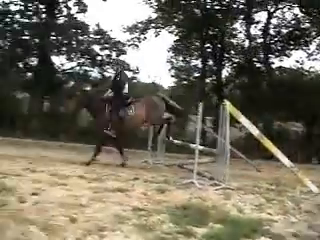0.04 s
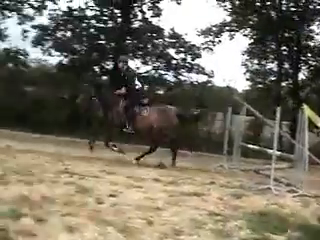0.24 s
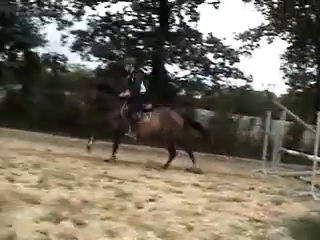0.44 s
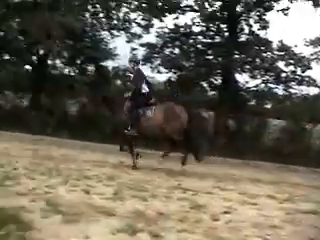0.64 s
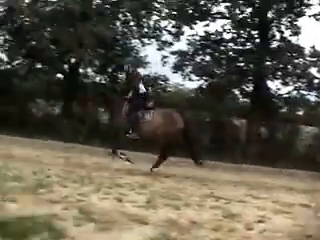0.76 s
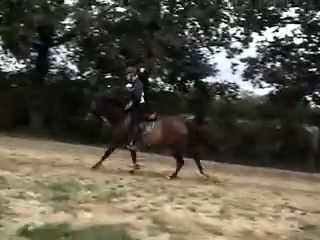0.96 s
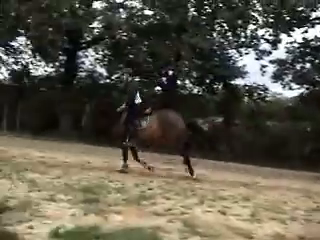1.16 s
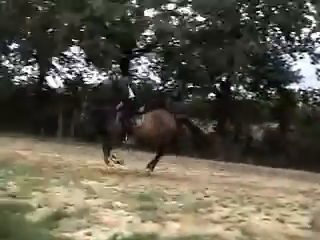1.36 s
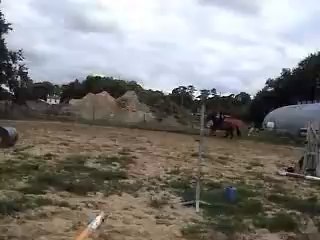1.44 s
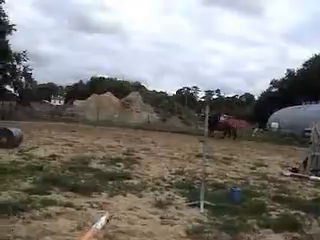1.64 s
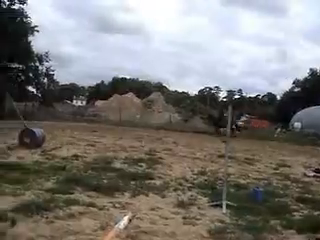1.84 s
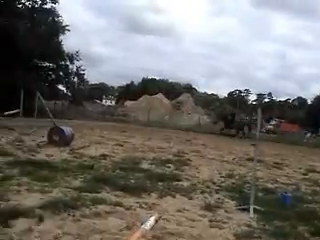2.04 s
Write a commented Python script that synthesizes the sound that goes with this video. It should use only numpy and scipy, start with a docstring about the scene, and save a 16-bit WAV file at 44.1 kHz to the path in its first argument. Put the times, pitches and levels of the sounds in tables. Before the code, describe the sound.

Hooves thud unevenly on sand as a horse lands, with a sharp rattling pole knock, and canters by outdoors. Wind rumbles on the microphone and leaves rustle; after a tiny break, a louder rush of wind takes over.

```python
"""Horse landing in a sandy arena

Outdoors, a horse lands from a jump and canters past the microphone. Just after the landing a loud
knock rings on, probably a jump pole, with a spray of sand; dull hoof thuds follow while wind buffets
the microphone. After a brief gap, a second scene begins with a louder, hissing rush."""
import sys
import numpy as np
from scipy import signal
from scipy.fft import rfft, irfft
from scipy.io import wavfile

SR = 44100
rng = np.random.default_rng(int(sys.argv[2]) if len(sys.argv) > 2 else 0)


def dump_mix(stems):
    """Bounce the given channels to the path in sys.argv[1] as a 16-bit WAV at rate SR."""
    frames = np.atleast_2d(stems).T  # one column per channel
    limited = np.clip(frames, -1, 1)  # hard clip at full scale
    pcm = np.round(limited * 32767).astype(np.int16)
    wavfile.write(sys.argv[1], SR, pcm)


N = 92610
T = np.arange(N) / SR
GAP_START_S, GAP_END_S = 1.542, 1.557


def from_db(db):
    """Decibels to gain."""
    return 10 ** (np.asarray(db) / 20)


def level(rows):
    """Gain over time from (time [s], level [dB]) points."""
    return from_db(np.interp(T, *np.transpose(rows)))


def colour(x, points):
    """Filter by a curve of (frequency [Hz], gain [dB]) points."""
    hz, db = np.transpose(points)
    bins_hz = np.maximum(np.arange(N + 1) * SR / (2 * N), 1)
    gain = from_db(np.interp(np.log(bins_hz), np.log(hz), db))
    return irfft(rfft(x, 2 * N) * gain)[:N]


def noise(spectrum, grain_db=0):
    """Coloured noise of rms 1; uneven grain sizes make it gritty."""
    sizes = from_db(grain_db * np.minimum(rng.exponential(1, N // 16 + 1), 5))
    x = colour(rng.standard_normal(N) * np.repeat(sizes, 16)[:N], spectrum)
    return x / x.std()


def strike(start, rise, decay):
    """Straight attack and exponential decay, times in seconds."""
    age = T - start
    return np.clip(age / rise, 0, 1) * np.exp(-np.maximum(age - rise, 0) / decay)


def swell(start, length):
    """A rounded rise and fall."""
    return np.sin(np.pi * np.clip((T - start) / length, 0, 1))


# Ringing modes of the pole: (frequency [Hz], level [dB], time to fall 60 dB [s])
POLE_MODES = [(197.8, -23.5, 0.3), (331, -32.5, 0.34), (522, -28.5, 0.24), (613, -24, 0.23),
              (684, -38, 0.55), (788, -27.5, 0.16), (932, -40.5, 0.4), (1184, -32, 0.38), (1318, -31, 0.5),
              (1390, -48, .3), (1444, -30.5, 0.41), (2187, -33.5, 0.48), (2410, -46, 0.23), (2432, -41, 1),
              (2806, -33, 0.57), (3130, -28.5, 0.31), (3171, -34, 0.32), (4023, -45.5, 0.92),
              (4280, -38, 0.49)]
# Spectra of the rattle and of crunching sand (smack and hooves): (frequency [Hz], gain [dB])
RATTLE_SPECTRUM = [(60, -26), (150, -5), (400, -3.5), (720, 7.5), (1000, 0), (1500, 4), (2200, 0),
                   (3100, -1.5), (3900, -8), (4350, -2.5), (8000, -10), (13000, -15)]
CRUNCH_SPECTRUM = [(50, -8), (130, 0), (300, 3), (700, 1.5), (1300, -8.5), (2500, -20), (4300, -31),
                   (8000, -30), (13000, -24)]
def pole_knock(start=.2065, thump_hz=222.5):
    """A heavy thump and smack, then a dense rattle and the ringing modes of the struck pole."""
    age = T - start
    pulse = np.exp(-.5 * ((age - .012) / .0068) ** 2) * np.clip(age / .0019, 0, 1)
    thump = from_db(-11.5) * pulse * -np.sin(2 * np.pi * thump_hz * age)
    smack = from_db(-17.5) * strike(start + .0063, rise=.004, decay=.0047) * noise(CRUNCH_SPECTRUM)
    settling = np.exp(-np.maximum(age - .12, 0) / .077)  # the rattle's tail dies faster
    rattle = from_db(-22) * strike(start + .0021, rise=.0087, decay=.12) * settling
    rattle *= noise(RATTLE_SPECTRUM, grain_db=2.1)
    ring = np.zeros(N)
    for hz, db, t60 in POLE_MODES:
        envelope = from_db(db) * strike(start + .0097, rise=.006, decay=t60 / np.log(1000))
        ring += envelope * np.sin(2 * np.pi * (hz * age + rng.random()))
    return thump + smack + rattle + ring


# Hoof falls going past the microphone:
# (time [s], thud level [dB], mid pitch [Hz], thud rise [s], crunch level [dB])
HOOF_FALLS = [(0.144, -29, 124, .005, -37), (0.425, -27, 96, 0.0037, -37.5),
              (.440, -24.5, 200, 0.0023, -45), (0.507, -31.5, 250, 0.0027, -45),
              (0.567, -20, 161.1, 0.0043, -27), (0.593, -30, 132, 0.0032, -37),
              (0.636, -43, 130, .003, -36), (0.659, -29.5, 121, 0.0065, -47), (.711, -22, 197, 0.0049, -27),
              (0.744, -27.5, 123, 0.0098, -33.5), (.924, -27, 157, 0.0082, -48),
              (.992, -22.5, 128, 0.0083, -54), (1.068, -25, 151.6, 0.01, -57),
              (1.115, -22.5, 178, 0.0035, -34), (1.155, -27.5, 139, 0.0057, -61),
              (1.237, -21.5, 150, 0.0087, -31), (1.268, -22.5, 160, 0.0046, -42),
              (1.326, -28.5, 174, 0.005, -41), (1.382, -30, 190, 0.0045, -35.5),
              (1.397, -27.5, 284, 0.0026, -43), (1.444, -32.5, 220, 0.0048, -47),
              (1.512, -28, 155, 0.0082, -49), (1.797, -23, 187, 0.003, -36), (1.828, -21, 127, 0.0067, -42),
              (2.039, -27.5, 167, 0.0054, -32.5)]
# What the arena floor passes on of a thud: (frequency [Hz], gain [dB])
GROUND_RESPONSE = [(30, -9), (60, 3), (110, -0.5), (400, 0.5), (1500, -10)]
def hooves(pitch_sag=.14):
    """Each hoof pushes the ground for a few cycles of sagging pitch and crunches the sand."""
    thuds, crunches = np.zeros(N), np.zeros(N)
    for start, thud_db, mid_hz, rise, crunch_db in HOOF_FALLS:
        age = np.maximum(T - start, 0) / rise  # in rise times
        push = (age * np.exp(1 - age)) ** 1.8
        hz = mid_hz * (age > 0) * (1 + pitch_sag * (np.exp(-age / 2) - .5))
        thuds += from_db(thud_db) * push * -np.sin(2 * np.pi * np.cumsum(hz) / SR)
        crunches += from_db(crunch_db) * strike(start, rise=.0014, decay=.0097)
    return colour(thuds, GROUND_RESPONSE) + crunches * noise(CRUNCH_SPECTRUM, grain_db=3)


# The harder hoof falls: (time [s], level [dB])
HARD_FALLS = [(0.567, -33), (.712, -29.5), (1.119, -33.5), (1.241, -31), (1.383, -34), (1.397, -33.5)]
# Their hollow spectrum: (frequency [Hz], gain [dB])
CLOP_SPECTRUM = [(120, -18), (280, 1.5), (450, -2.5), (700, -3), (1000, -15), (2500, -33)]
def clops():
    """Packed sand under the hoof gives a short hollow knock."""
    envelope = sum(from_db(db) * strike(start, rise=.0014, decay=.0057) for start, db in HARD_FALLS)
    return envelope * noise(CLOP_SPECTRUM)


# Sand kicked up from the arena floor: (time [s], length [s], level [dB])
SAND_SPRAYS = [(0.179, 0.051, -34.5), (0.356, 0.097, -41.5), (.768, 0.096, -37)]
# Ticks of grit or tack: (time [s], level [dB])
GRIT_TICKS = [(.2165, -18), (0.2321, -15.5), (0.568, -34), (0.635, -42), (0.794, -35.5), (1.115, -28.5)]
# Spectra of both at the microphone: (frequency [Hz], gain [dB])
SPRAY_SPECTRUM = [(200, -22), (700, 9), (1500, -1.5), (2500, -3.5), (3500, -6), (4200, -14), (8000, -13),
                  (13000, -17)]
TICK_SPECTRUM = [(400, -8), (1500, 2), (2600, 2.5), (3500, 9), (4100, -12), (8000, -7), (13000, -5.5)]
def grit():
    """Flying sand hisses in sprays that start fast and hold; grit or tack ticks sharply."""
    sprays = sum(from_db(db) * np.abs(swell(start, length)) ** .46 for start, length, db in SAND_SPRAYS)
    ticks = sum(from_db(db) * strike(start, rise=.00056, decay=.0015) for start, db in GRIT_TICKS)
    return sprays * noise(SPRAY_SPECTRUM, grain_db=1.6) + ticks * noise(TICK_SPECTRUM)


# Buffeting and deep rumble right on the microphone: (time [s], level [dB])
BUFFET_LEVELS = [(0, -61), (.38, -49.5), (.55, -44.5), (.68, -41), (.78, -37), (.87, -39), (.96, -34.5),
                 (1.04, -39.5), (1.1, -34.5), (1.19, -44.5), (1.29, -33), (1.38, -43), (1.47, -44),
                 (1.62, -53), (1.75, -49), (1.85, -38), (1.95, -69), (2.07, -41.5)]
RUMBLE_LEVELS = [(0, -58), (.1, -54), (.2, -40), (.3, -68), (.42, -48.5), (.55, -47), (.66, -43), (.8, -52),
                 (.9, -43), (1.04, -43), (1.17, -59), (1.4, -64), (1.6, -58), (1.72, -51), (1.86, -44),
                 (1.96, -61), (2.06, -42.5)]
# Their spectra: (frequency [Hz], gain [dB])
BUFFET_BAND = [(25, -31), (50, -35), (90, -3), (140, 0.5), (200, -2.5), (300, -16.5), (600, -22),
               (1500, -68)]
RUMBLE_BAND = [(20, -12), (35, -5), (65, 1), (95, -0.5), (140, -21), (300, -45), (1000, -67)]
def microphone_wind():
    """Gusts push on the microphone, making low, uneven noise."""
    return level(BUFFET_LEVELS) * noise(BUFFET_BAND) + level(RUMBLE_LEVELS) * noise(RUMBLE_BAND)


# Trees by the arena before the gap, and the hissing rush after it: (time [s], level [dB])
RUSTLE_LEVELS = [(0, -42), (.12, -45.5), (.45, -41), (.68, -43.5), (.92, -44), (1.05, -43.5), (1.18, -43.5),
                 (1.35, -42), (1.45, -46.5), (1.54, -44)]
RUSH_LEVELS = [(1.56, -32.5), (1.63, -36), (1.72, -34), (1.9, -34.5), (2.1, -36)]
# Spectra of the nearby leaves and of the rush: (frequency [Hz], gain [dB])
RUSTLE_BAND = [(40, -15), (200, -0.5), (400, -5), (720, 2), (1200, -4.5), (2500, -10), (4300, -16),
               (8000, -20), (13000, -22.5)]
RUSH_BAND = [(40, -20), (200, 0), (400, 0.5), (780, 1.5), (1300, -3), (2500, -8), (4300, -12.5),
             (8000, -18.5), (13000, -21.5)]
def rustle_and_rush():
    """Wind stirs the leaves into a grainy rustle; in the second scene a louder rush replaces it."""
    rustle = level(RUSTLE_LEVELS) * noise(RUSTLE_BAND, grain_db=1.5)
    rush = level(RUSH_LEVELS) * noise(RUSH_BAND, grain_db=1.27)
    return np.where(T < GAP_END_S, rustle, rush)


# Spectrum of the hiss: (frequency [Hz], gain [dB])
HISS_SPECTRUM = [(100, -12), (400, 2), (1400, 1.5), (3000, -6.5), (4300, -8), (8000, -16), (13000, -19)]
def hiss_burst(length_s=.029):
    """A short, even burst of hiss opens the second scene."""
    gate = (T > GAP_END_S) & (T < GAP_END_S + length_s)
    return from_db(-29.5) * gate * noise(HISS_SPECTRUM)


def low_tone(start=1.64, length_s=.16, mid_hz=260.5, fall=.13):
    """A faint, slightly falling tone within the rush."""
    progress = np.clip((T - start) / length_s, 0, 1)
    hz = mid_hz * (1 - fall * (progress - .5))
    return from_db(-35.5) * swell(start, length_s) * np.sin(2 * np.pi * np.cumsum(hz) / SR)


def scene():
    """Horse, pole and background, summed to mono."""
    foreground = hooves() + clops() + grit() + pole_knock()
    background = rustle_and_rush() + microphone_wind() + low_tone() + hiss_burst()
    return (foreground + background)[None]


# A small microphone with a deep notch and weak treble: (frequency [Hz], gain [dB])
MIC_RESPONSE = [(20, -2), (4450, 1.5), (4620, -13), (4780, -33), (5200, -25), (5400, -19.5), (7300, -17),
                (7900, -10.5), (11000, -9), (13000, -15.5)]
def record(dry, gap_db=-27, cutoff_hz=13000):
    """A brief gap parts the scenes; the microphone colours the sound and a low-pass cuts the top."""
    gap = np.where((T > GAP_START_S) & (T < GAP_END_S), from_db(gap_db), 1)
    heard = colour(dry[0] * gap, MIC_RESPONSE)
    low_pass = signal.ellip(12, .1, 80, cutoff_hz, fs=SR, output="sos")
    return signal.sosfilt(low_pass, heard)[None]


dry = scene()
out = record(dry)
dump_mix(out)
```